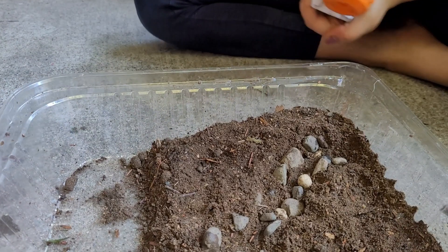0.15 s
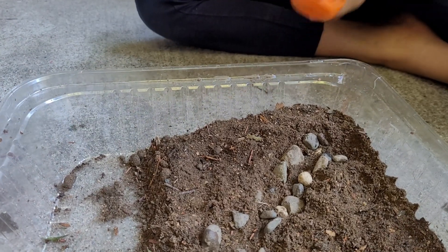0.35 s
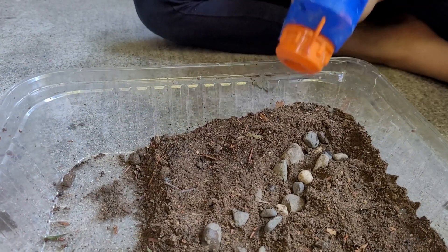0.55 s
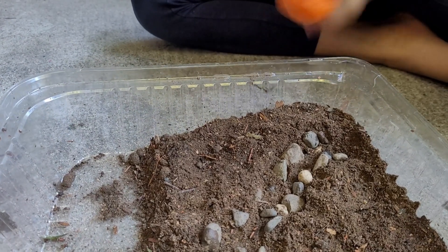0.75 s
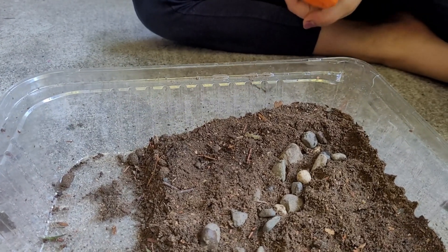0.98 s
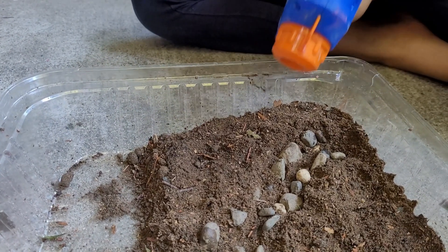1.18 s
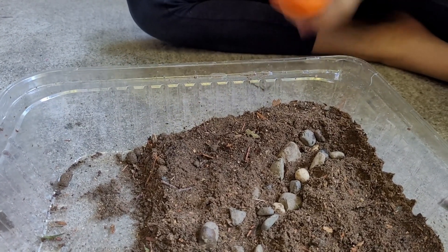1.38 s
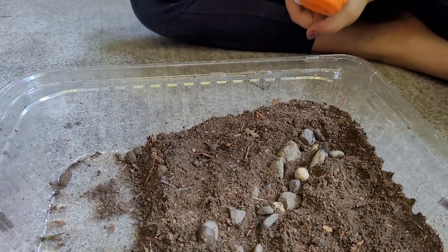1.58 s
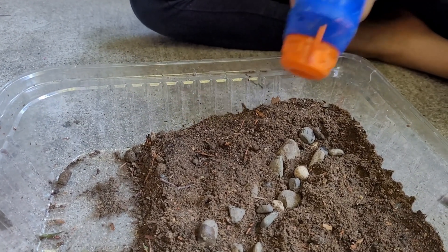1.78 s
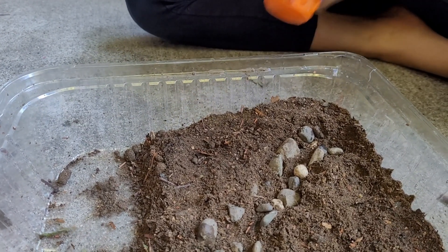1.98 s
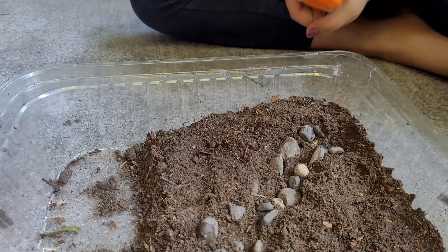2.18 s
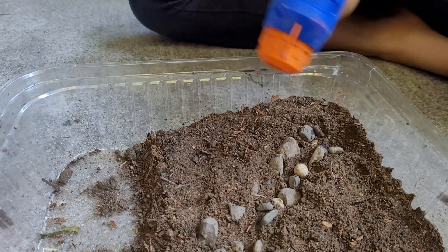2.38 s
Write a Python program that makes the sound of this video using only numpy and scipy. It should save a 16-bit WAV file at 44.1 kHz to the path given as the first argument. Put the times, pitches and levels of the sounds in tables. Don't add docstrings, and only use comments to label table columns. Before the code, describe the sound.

Close up indoors, a hollow plastic pump slides out and in four times; each stroke hisses and stops with a clack, loose parts tick between, and the third push rebounds with a scrape over faint low room rumble.

```python
import sys
import numpy as np
from scipy import signal
from scipy.fft import rfft, irfft, next_fast_len
from scipy.io import wavfile

SR = 44100
rng = np.random.default_rng(int(sys.argv[2]) if len(sys.argv) > 2 else 0)


def unload_wav(signal):
    wavfile.write(
        sys.argv[1],
        SR,
        np.round(np.clip(np.atleast_2d(signal).T, -1, 1) * 32767).astype(np.int16),
    )


def volts(x):
    e = np.asarray(x, float) / 20
    return 10 ** e


N = 108045
T = np.arange(N) / SR
EDGES = 24 * 2 ** np.arange(0, 9.6, .5)
SIDE = np.array([[1], [-1]])


def rms_one(x):
    return x / np.sqrt(np.mean(x ** 2) + 1e-20)


def at_hz(points, hz):
    table = np.array(points)
    return np.interp(np.log(hz), np.log(table[:, 0]), table[:, 1])


def edge(x, hz, kind, order):
    return signal.sosfilt(signal.butter(order, hz, kind, fs=SR, output="sos"), x)


def drift(rate_hz):
    count = int(N / SR * 2 * 400) + 2
    return 1.22 * np.interp(T * 2 * rate_hz, np.arange(count), rng.standard_normal(count))


def ring(x, hz, t60):
    radius = volts(-60 / (t60 * SR))
    angle = 2 * np.pi * hz / SR
    return signal.lfilter([0, np.sin(angle)], [1, -2 * radius * np.cos(angle), radius ** 2], x + 1e-18)


def bands(white, gain, alike=None):
    out = 0
    for k, (low, high) in enumerate(zip(EDGES, EDGES[1:])):
        part = signal.sosfilt(signal.butter(2, [low, high], "band", fs=SR, output="sos"), white[k % 2])
        hz = np.sqrt(low * high)
        if alike:
            c = np.clip(at_hz(alike, hz), -1, 1)
            part = np.sqrt(1 + c) * part[0] + np.sqrt(1 - c) * part[1] * SIDE
        out = out + gain(hz) * part
    return out


def hiss(colour, patchy_db, white=None):
    if white is None:
        white = rng.standard_normal((2, N))
    together = drift(60)
    return rms_one(bands(white, lambda hz: volts(at_hz(colour, hz) + patchy_db * (together + drift(40)))))


def wavering_tone(hz, width_hz):
    phase = 2 * np.pi * np.cumsum(hz) / SR
    return rms_one(drift(width_hz) * np.cos(phase) + drift(width_hz) * np.sin(phase))


# (frequency [Hz], level [dB])
FLOOR = [(15, -32), (25, -6), (59, 0), (531, -8), (677, -16), (754, -12), (5880, -32), (8140, -30.5),
         (16000, -59)]
# (frequency [Hz], left-right likeness [-1 to 1])
LIKENESS = [(60, .8), (250, .6), (700, 0), (2000, -.4), (5000, -.2), (12000, 0)]


def room_noise():
    white = rng.standard_normal((2, 2, N))
    floor = bands(white, lambda hz: volts(at_hz(FLOOR, hz) + 2.0 * drift(7.5)), LIKENESS)
    return volts(-54) * rms_one(floor)


# (time [s], level [dB])
RUMBLE = [(0.0, -84), (0.04, -46), (0.12, -56.5), (0.65, -42), (0.75, -57.5), (1.25, -50.5), (1.29, -69),
          (1.32, -56), (1.72, -48.5), (2.34, -54.5), (2.41, -44.5), (2.45, -49)]


def distant_drone():
    s, db = np.transpose(RUMBLE)
    mid, side = (wavering_tone(np.full(N, 55.2), width_hz=14) for _ in "ms")
    return volts(np.interp(T, s, db)) * (mid + volts(-22) * side * SIDE)


# (frequency [Hz], t60 [s])
ROOM_T60 = [(150, 0.25), (400, 0.15), (1000, 0.2), (2800, 0.19), (5000, 0.17), (14000, 0.15)]
# (frequency [Hz], level [dB])
ROOM_DB = [(150, -4), (500, -4.5), (1300, -5.5), (2500, 0.5), (4000, 0), (8000, 0.5), (15000, -2.5)]
# (frequency [Hz], left lead [rad])
PORT_PHASE = [(100, 0.59), (700, -0.35), (1400, -0.8), (2100, -1.1), (4500, -1.07), (7000, -0.87),
              (16000, 1)]
# (frequency [Hz], left minus right [dB])
LEAN = [(60, 5), (150, 0.0), (380, -1.5), (950, 0.5), (2380, 4.5), (5980, -0.5), (15000, 0.0)]


def room(x):
    size = next_fast_len(N + SR)
    t = T[:SR // 3]
    hz = np.arange(size // 2 + 1) * SR / size + 1
    onset = np.clip((t - .004) / 0.0038, 0, 1)

    def decay(f):
        t60 = at_hz(ROOM_T60, f)
        return volts(at_hz(ROOM_DB, f) - 60 * t / t60) * np.sqrt(7 / t60 / SR) * onset

    tail = bands(rng.standard_normal((2, 2, len(t))), decay, LIKENESS)
    direct = np.exp(.5j * SIDE * at_hz(PORT_PHASE, hz))
    ports = volts(SIDE * at_hz(LEAN, hz) / 2) * (direct + rfft(tail, size))
    return irfft(rfft(x, size) * ports, size)[:, :N]


# (time [s], length [s], frequency [Hz], rise [Hz], level [dB])
SQUEAKS = [
    (1.503, .026, 2920, 20, -33),
    (2.147, .016, 3220, 60, -34),
    (.868, .018, 1300, 40, -37),
    (2.36, .018, 500, 20, -36),
    (2.376, .02, 1200, 250, -34),
    (1.124, .014, 480, 10, -40),
    (.488, .03, 1180, 60, -44),
]


def squeaks():
    out = np.zeros(N)
    for s, length, hz, rise_hz, db in SQUEAKS:
        u = np.clip((T - s) / length, 0, 1)
        cycles = length * (hz * u + rise_hz * u ** 2 / 2)
        out += volts(db + 1.0) * np.sin(np.pi * u) * np.sin(2 * np.pi * cycles)
    return out


# (time [s], level [dB])
REBOUND = [
    (1.856, -48),
    (1.868, -37),
    (1.874, -19.5),
    (1.883, -28.5),
    (1.895, -22),
    (1.908, -29.5),
    (1.924, -21),
    (1.948, -29),
    (1.997, -50.5),
]
# (frequency [Hz], level [dB per Hz])
REBOUND_COLOUR = [(53, -32.5), (90, -11), (224, 1.5), (568, 0.5), (876, -5), (2380, -7.5), (2800, -16.5),
                  (8000, -16.5), (16000, -29.5)]


def slip_train():
    slipping = rng.random(N) < 2600 / SR
    height = volts(4.3 * np.minimum(rng.exponential(1, N), 3))
    return rms_one(slipping * height * rng.choice([-1, 1], N))


def rebound():
    slips = np.array([slip_train() for _ in range(2)])
    grit = hiss(REBOUND_COLOUR, 1.5, .5 * slips + .5 * rng.standard_normal((2, N)))
    body = rms_one(sum(volts(db) * ring(slips[0], hz, t60) for hz, db, t60, _ in PULL_MODES + PUSH_MODES))
    s, db = np.transpose(REBOUND)
    pressure_db = np.interp(T, s, db + 4.5, left=-120, right=-120)
    sputter_db = 1.5 * drift(150)
    return volts(pressure_db + sputter_db) * (grit + volts(-12) * body)


def speed(strokes, swell):
    gain, travel = np.zeros(N), np.zeros(N)
    for start, stop, db, _ in strokes:
        u = np.clip((T - start) / (stop - start), 0, 1)
        die_away = np.exp(-np.maximum(T - stop, 0) / 0.0097)
        gain += volts(db) * np.sin(np.pi * u / 2) ** swell * die_away
        travel += u * (T < stop + .05)
    return gain, travel


# (start [s], stop [s], hiss at the stop [dB], knock [dB])
PULLS = [
    (0.155, 0.2479, -33.5, -12),
    (0.807, 0.9066, -34, -13),
    (1.424, 1.5387, -36.5, -14.5),
    (2.058, 2.1619, -30.5, -15.5),
]
# (frequency [Hz], level [dB per Hz])
PULL_HISS = [(88, -22), (150, -1), (545, -0.5), (2140, -10.5), (2870, -9), (3220, -10), (8230, -11),
             (14000, -15.5), (16000, -37)]


def pulls():
    gain, _ = speed(PULLS, swell=4.2)
    return gain * hiss(PULL_HISS, patchy_db=2.54)


# (start [s], stop [s], hiss at the stop [dB], knock [dB])
PUSHES = [
    (0.455, 0.5835, -31.5, -13.5),
    (1.102, 1.2118, -31, -12.5),
    (1.732, 1.839, -29, -12.5),
    (2.334, 2.463, -30.5, -18),
]
# (frequency [Hz], level [dB per Hz])
PUSH_HISS = [(88, -50), (150, -22.5), (280, -5), (406, -25.5), (566, 2), (702, -18), (871, -12.5),
             (8070, -19.5), (16000, -29.5)]
BARREL_DB = [-6.5, -7, -19, -34, -17.5]


def pushes():
    gain, travel = speed(PUSHES, swell=2.16)
    lowest_hz = 229.8 * (1 + .28 * travel)
    tones = sum(volts(db) * wavering_tone(k * lowest_hz, width_hz=36) for k, db in enumerate(BARREL_DB, 1))
    return gain * (hiss(PUSH_HISS, patchy_db=2.65) + tones)


def knocks(hits, modes):
    spread_db, swell_cycles, crack_t60 = 3, 0.78, 0.034
    out, crack = np.zeros(N), np.zeros(N)
    s, db, crack_db = np.transpose([h for h in hits if h[0] < (N - 400) / SR])
    for hz, level_db, t60, late in modes:
        clicks = np.zeros(N)
        chance_db = spread_db * rng.standard_normal(len(s))
        clicks[((s + late) * SR).astype(int)] = volts(db + level_db + 12.5 + chance_db)
        u = np.arange(0, 2 * swell_cycles, hz / SR)
        contact = np.cos(2 * np.pi * u) * np.sin(np.pi * u / (2 * swell_cycles)) ** 2
        out += ring(signal.lfilter(4 * contact / len(u), [1], clicks), hz, t60)
    crack[(s * SR).astype(int)] = volts(db + crack_db + 10.5)
    return out, signal.lfilter([1], [1, -volts(-60 / (crack_t60 * SR))], crack)


# (frequency [Hz], level [dB], t60 [s], delay [s])
PULL_MODES = [(1341, -6, 0.018, .001), (447.5, 5.5, 0.015, 0.001974), (385.6, -10.5, .06, 0.0021),
              (283.3, -24.5, 0.21, 0.0022), (755, -18.5, 0.15, .002), (521, -6.5, 0.022, 0.00191),
              (948, -8, 0.021, .001), (2450, -24.5, 0.013, 0.00067), (3500, -27.5, .006, 0.00098),
              (8240, -17.5, .006, 0.00048)]
# (frequency [Hz], level [dB], t60 [s], delay [s])
PUSH_MODES = [(1303, 1, 0.012, 0.00026), (479, -9.5, 0.032, 0.00094), (221.5, -16.5, 0.035, 0.0018),
              (742, -22, 0.15, 0.0017), (557, -18.5, 0.028, 0.0014), (1583, -16.5, 0.023, 0.00034),
              (1975, -10, 0.0092, 0.00038), (2800, -21, 0.0071, 0.00021), (4220, -33.5, 0.0069, .0001)]
# (time [s], peak [dB], brightness [dB])
TICKS = [(0.013, -42, -3), (0.039, -52, -1), (0.077, -40.5, -5), (0.445, -30.5, -17.5), (0.7, -43, 4),
         (0.744, -37, -6), (0.763, -55, -8.5), (1.304, -33.5, -3), (1.34, -43, -6), (1.371, -36.5, -7),
         (2.079, -39, -1)]
# (frequency [Hz], level [dB per Hz])
CRACK_COLOUR = [(150, -11), (500, 0.5), (2500, -2), (3500, -6), (6000, -16), (8500, -12.5), (16000, -20)]


def stops_and_ticks():
    pull_hits = [(stop, db, -12.5) for _, stop, _, db in PULLS]
    push_hits = [(stop, db, -16) for _, stop, _, db in PUSHES]
    tick_hits = [(s, db - 19, bright_db) for s, db, bright_db in TICKS]
    pull, pull_crack = knocks(pull_hits + tick_hits, PULL_MODES)
    push, push_crack = knocks(push_hits, PUSH_MODES)
    crack = pull_crack + push_crack
    onsets = np.maximum(np.diff(crack, prepend=0), 0)
    snap = edge(onsets, 3800, "low", order=1)
    return pull + push + volts(10) * snap + crack * hiss(CRACK_COLOUR, patchy_db=1.96)


def scene():
    gun = squeaks() + rebound() + pulls() + pushes() + stops_and_ticks()
    return room_noise() + distant_drone() + room(edge(gun, 176.5, "high", order=3))


def low_pass(x):
    return signal.sosfilt(signal.butter(12, 16540, fs=SR, output="sos"), x)


def record(dry):
    rounded = 1.313 * np.tanh(dry / 1.238)
    top_cut = signal.cheby2(14, 40, 16100, fs=SR, output="sos")
    return low_pass(signal.sosfilt(top_cut, rounded))


dry = scene()
out = record(dry)
unload_wav(out)
```